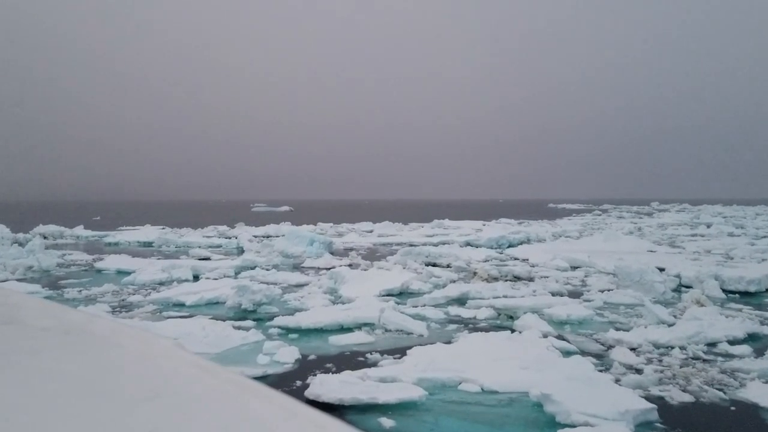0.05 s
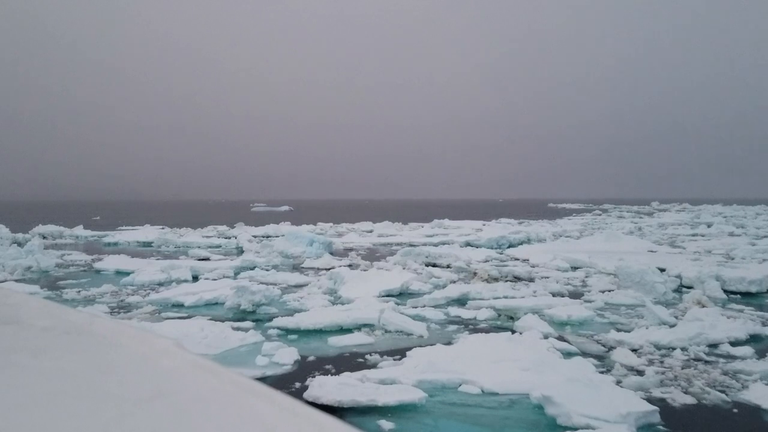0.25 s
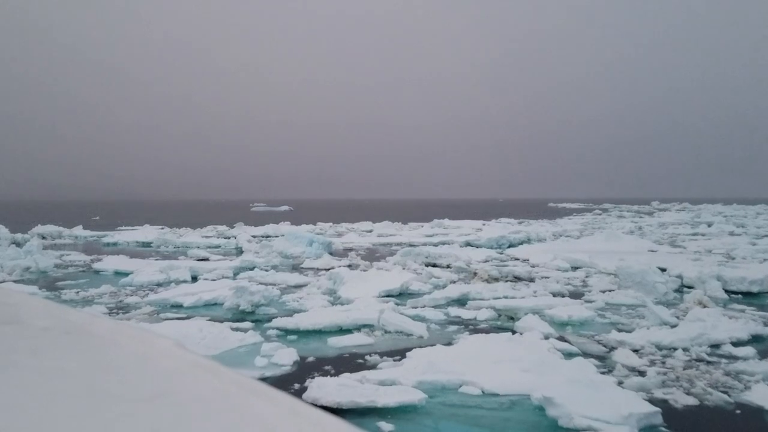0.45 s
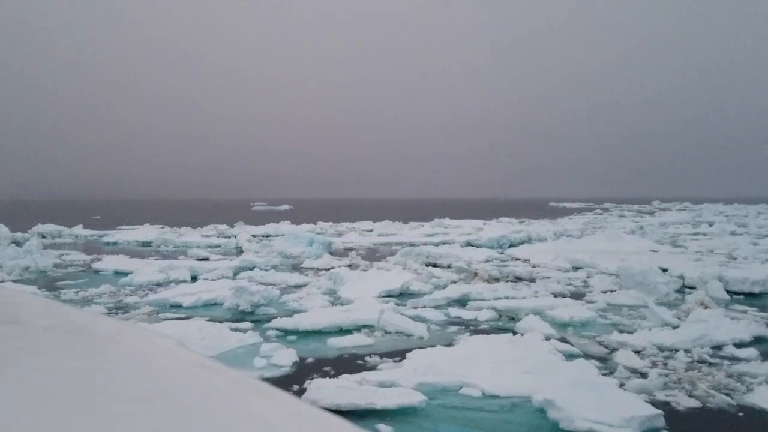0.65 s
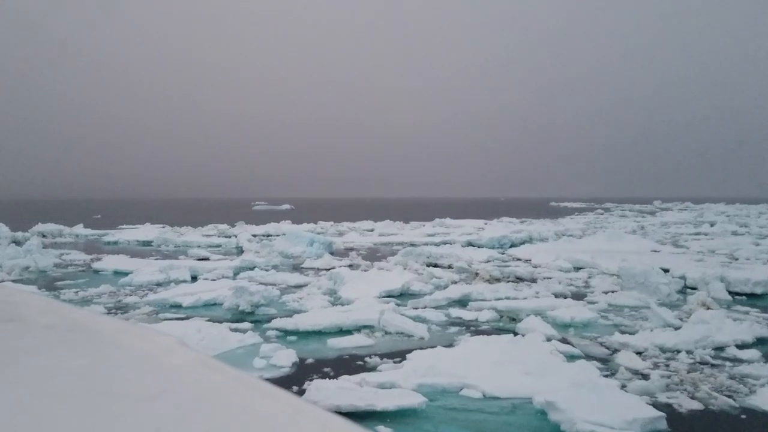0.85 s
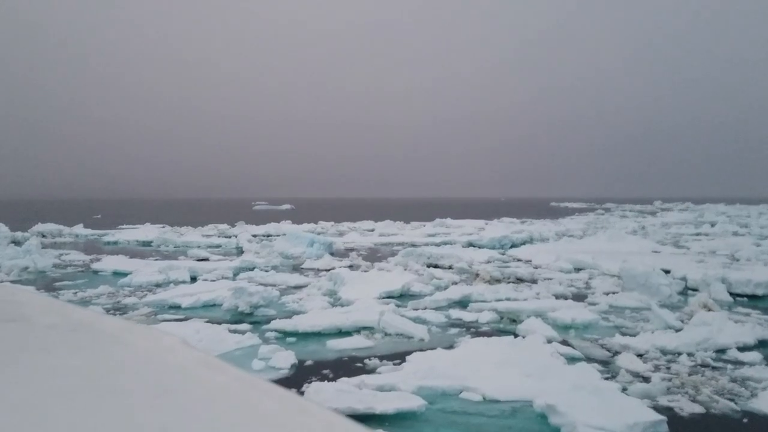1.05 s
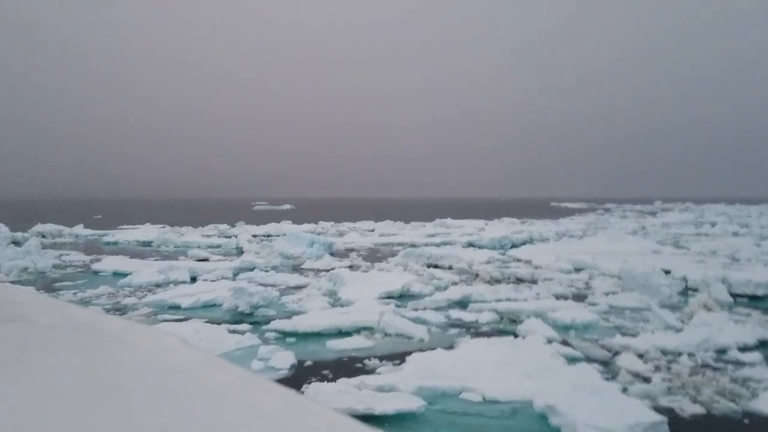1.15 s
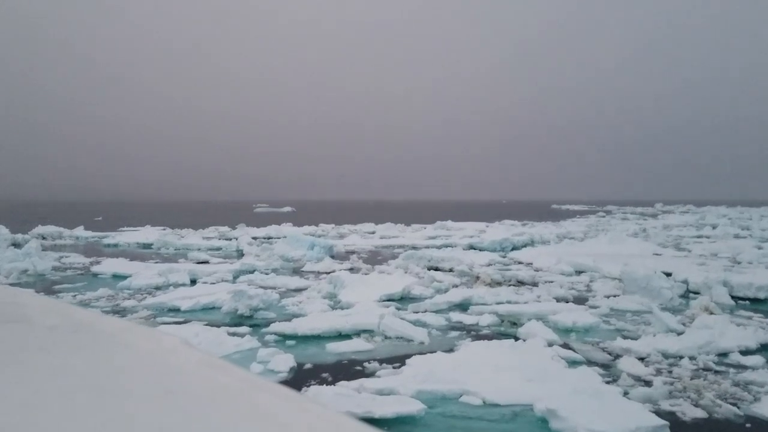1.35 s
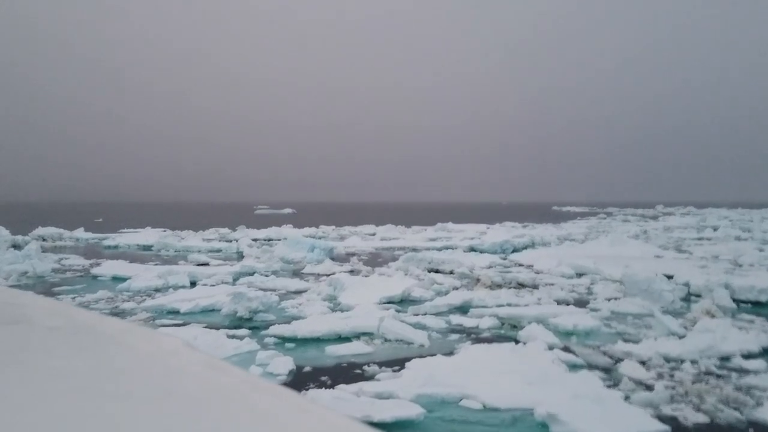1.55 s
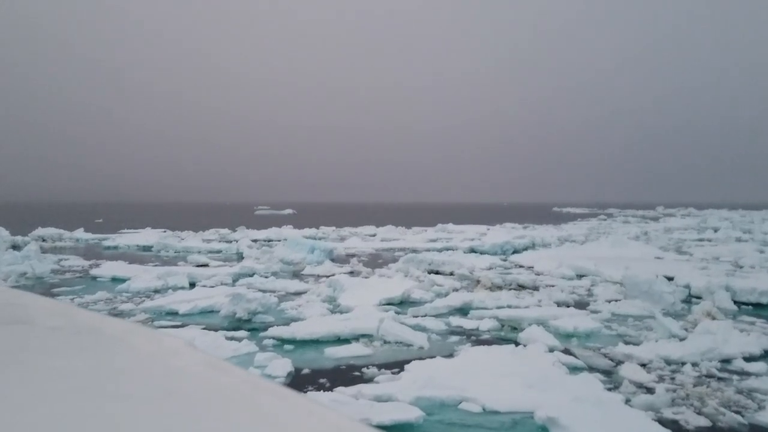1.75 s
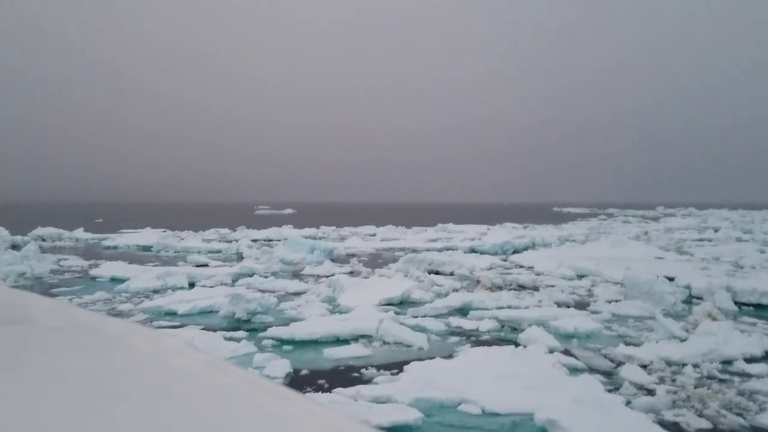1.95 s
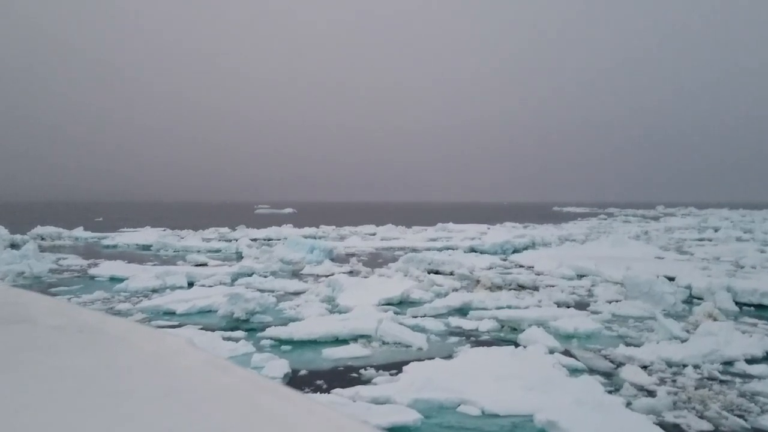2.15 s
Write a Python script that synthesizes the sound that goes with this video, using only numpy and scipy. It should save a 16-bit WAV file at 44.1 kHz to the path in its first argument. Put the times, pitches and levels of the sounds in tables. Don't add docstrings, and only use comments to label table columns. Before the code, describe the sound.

Low booming hull rumble rises quickly and slowly subsides, with crushed ice crunching, short gritty rubs and small cracks; light wind and slush behind. Two spaced deck microphones, hull slightly left, ice nearer the right.

```python
import sys
import numpy as np
from scipy import signal
from scipy.fft import rfft, irfft, next_fast_len
from scipy.io import wavfile
from scipy.ndimage import uniform_filter1d, map_coordinates

SR = 44100
rng = np.random.default_rng(int(sys.argv[2]) if len(sys.argv) > 2 else 0)


def nominal_scale(level):
    x = np.asarray(level, float) / 20
    return 10 ** x


def pcm_store(signal):
    levels = np.round(np.clip(np.atleast_2d(signal), -1, 1) * 32767)
    wavfile.write(sys.argv[1], SR, levels.astype(np.int16).T)


N = 97020

# f/Hz, level/dB per Hz
WIND_COLOUR = [(12, -61), (20, -12.5), (81, -3.5), (189, -33.5), (300, -20), (390, -36), (660, -120)]
# t/s, level/dB
SLUSH_LEVEL = [
    (0.0, -82),
    (0.37, -80.5),
    (0.7, -89),
    (1.68, -90),
    (2.2, -89.5),
]
# f/Hz, level/dB per Hz
SLUSH_COLOUR = [(230, -22.5), (430, 1), (800, -2), (1850, -7), (3640, -17.5), (5600, -22), (12500, -29.5),
                (15600, -35)]
# f/Hz, likeness/0..1
ICE_ALIKE = [(500, .58), (2000, .55), (5000, .42), (9000, .2), (13000, .3)]
# t/s, peak level/dB, f/Hz, length/cycles
TICKS = [(.3865, -71, 2480, 1), (.8645, -59.5, 2450, 1.3), (.8647, -77, 1100, 0.92), (.865, -74, 9500, 1.4),
         (.937, -69.5, 3000, 1.4), (.9372, -61, 1300, 1.1), (1.1402, -71, 3500, 1.1),
         (1.058, -80, 11000, 1.5), (.974, -73, 10000, 1.7), (1.1024, -81, 2500, 1),
         (1.117, -79, 5960, 0.75), (1.14, -67.5, 12000, 1.7), (1.5625, -73, 2480, 1),
         (1.7444, -80, 4000, 14), (1.594, -62, 700, 1.5), (1.772, -57, 600, 1.7), (1.797, -65, 500, 3.3),
         (1.862, -57.5, 376, 6.9), (1.552, -71, 403, 6.3), (1.9, -81, 4800, 4.35), (1.954, -75, 3600, 7.3)]
# t/s, length/s, level/dB, treble lift/dB
SCRAPES = [(0.025, 0.043, -74, 7), (0.163, 0.21, -67.5, -2.5), (0.374, 0.16, -64.5, -4),
           (0.572, 0.1, -62.5, -16), (0.7, 0.046, -70.5, 1), (0.874, 0.033, -67.5, -2),
           (0.895, 0.037, -82, 12), (1.004, 0.031, -87.5, 18), (1.098, 0.041, -65, -3),
           (1.202, 0.023, -78, -1), (1.228, 0.025, -74, -9), (1.301, 0.027, -73, -9), (1.38, 0.052, -75, 3),
           (0.096, 0.034, -68, -8), (1.898, 0.028, -75, -3), (1.916, 0.091, -71.5, -9)]
# f/Hz, level/dB per Hz
SCRAPE_COLOUR = [(500, -52), (1200, 3), (1800, 1), (2800, -7.5), (4400, -16), (5500, -23), (12500, -15),
                 (15600, -27)]
# f/Hz, width/Hz, level/dB
GRIT_RINGS = [(2930, 90, 2), (3620, 230, 5.5), (4330, 100, 6.5)]
# t/s, hull pressure level/dB, crushing level/dB
GRIND = [(0.0, -87, -84), (0.16, -56.5, -84), (0.22, -48, -76), (0.3, -43.5, -67.5), (0.39, -41, -69),
         (0.56, -39.5, -64.5), (0.73, -40, -66.5), (0.88, -43.5, -73.5), (1.15, -49, -75.5),
         (1.21, -48.5, -74), (1.31, -51.5, -75.5), (1.45, -51.5, -76), (1.51, -53, -82.5), (1.6, -52, -80),
         (1.79, -53, -82), (1.9, -56, -77.5), (2.0, -54, -75), (2.12, -58, -77.5), (2.2, -54.5, -74)]
# f/Hz, level/dB per Hz
CRUNCH_COLOUR = [(650, -23), (1100, 4), (1970, -6), (3210, -20), (3570, -21.5), (3980, -19), (4270, -20.5),
                 (6000, -38.5), (7800, -64), (13200, -120)]
# f/Hz, width/Hz, level/dB
CRUNCH_RINGS = [(3600, 230, 4.5), (4200, 130, 0), (2430, 66, -12)]
# t/s, peak level/dB, f/Hz, length/s
BOOMS = [(.054, -66, 478, .025), (.234, -52, 300, .054), (.24, -49, 120, .04), (.285, -42, 72, .055),
         (.299, -43, 286, .06), (.345, -45, 75, .04), (.355, -46, 135, .03), (.4, -45, 100, .04),
         (.41, -46, 420, .06), (.425, -41, 155, .04), (.47, -42, 115, .04), (.47, -46, 280, .07),
         (.495, -38, 80, .06), (.56, -41, 128, .04), (.578, -38, 74, .07), (.645, -40, 124, .05),
         (.66, -45, 70, .05), (.7, -45, 90, .05), (.717, -44, 420, .066), (.76, -40, 124, .05),
         (.77, -42, 68, .05), (.79, -48, 500, .05), (.855, -37, 120, .08), (.92, -47, 90, .04),
         (1.0, -43, 118, .07), (1.06, -45, 85, .04), (1.131, -51, 429, .06), (1.14, -44, 125, .05),
         (1.205, -42, 125, .045), (1.215, -44, 195, .04), (1.265, -47, 105, .045), (1.345, -46, 100, .07),
         (1.4, -48, 122, .05), (1.42, -54, 60, .05), (1.455, -51, 110, .035), (1.56, -54, 90, .04),
         (1.625, -48, 120, .05), (1.668, -47, 130, .03), (1.74, -49, 120, .035), (1.77, -51, 150, .035),
         (1.81, -53, 90, .035), (1.85, -55, 200, .05), (1.935, -48, 112, .04), (1.975, -50, 105, .04),
         (2.02, -53, 125, .04), (2.06, -50, 155, .035), (2.185, -49, 100, .035)]
# f/Hz, level/dB per Hz
HULL_COLOUR = [(18, -47), (35, -8), (60, -2), (115, -1.5), (230, -7), (500, -11.5), (560, -17.5),
               (950, -32), (1300, -42), (2500, -65)]
# f/Hz, width/Hz, level/dB
PLATES = [(74, 14, -8), (122, 22, -6), (195, 25, -2), (286, 12, 3), (418, 10, 4), (497, 10, 1),
          (720, 60, 0), (900, 45, 3)]
# f/Hz, likeness/0..1
HULL_ALIKE = [(40, .82), (130, .94), (300, .9), (550, .58), (1200, .15)]
# f/Hz, extra left level/dB
HULL_LEAN = [(35, -4.5), (70, 1.1), (280, 1), (600, -0.5)]

HULL_LAG_S, ICE_LAG_S = -0.00016, 0.000431


def unit(x):
    return x / np.sqrt(np.mean(x ** 2) + 1e-20)


def along(points, hz):
    f, v = np.transpose(points)
    return np.interp(np.log(hz + 1), np.log(f + 1), v)


def curve(rows, column=1):
    table = np.transpose(rows)
    return np.interp(np.arange(N) / SR, table[0], table[column])


def wobble(rate):
    return map_coordinates(rng.standard_normal(N // 100), [np.arange(N) * rate / SR])


def filtered(x, response):
    m = next_fast_len(N + SR // 2)
    return irfft(rfft(x, m) * response(np.fft.rfftfreq(m, 1 / SR)), m)[..., :N]


def ringing(f, peaks):
    return 1 + sum(nominal_scale(db) * 1j * f * w / (c * c - f * f + 1j * f * w) for c, w, db in peaks)


def even(x, over_s=.08):
    size = round(over_s * SR)
    power = uniform_filter1d(np.mean(x ** 2, axis=0), size=size)
    power = uniform_filter1d(power, size=size)
    return unit(x / np.sqrt(np.abs(power) + 1e-20))


def patchy(depth_db, grains_per_s=None, spread_db=0):
    x = rng.standard_normal((2, N))
    if grains_per_s:
        struck = rng.random((2, N)) < grains_per_s / SR
        x = x * struck * nominal_scale(spread_db * rng.exponential(size=(2, N)))
    z = signal.stft(x, nperseg=512)[2]
    field = uniform_filter1d(rng.standard_normal(z.shape[1:]), size=6, axis=0)
    field = uniform_filter1d(field, size=5, axis=1)
    return signal.istft(z * nominal_scale(depth_db * unit(field)), nperseg=512)[1][:, :N]


def heard(pair, colour, alike, lag_s):
    def turn(hz):
        return np.arccos(np.clip(along(alike, hz), -1, 1)) / 2

    def gain(hz):
        return colour(hz) * np.exp(np.outer([-1j, 1j], np.pi * hz * lag_s))

    shared = filtered(pair[0], lambda hz: gain(hz) * np.cos(turn(hz)))
    opposed = filtered(pair[1], lambda hz: gain(hz) * np.sin(turn(hz)) * [[1], [-1]])
    return unit(shared + opposed)


def wind():
    puffs = heard(patchy(1.5), lambda f: nominal_scale(along(WIND_COLOUR, f)), [(50, .05)], 0)
    gusts_db = 2.5 * np.array([wobble(22), wobble(22)])
    return even(puffs) * nominal_scale(-66.5 + gusts_db)


def slush():
    hiss = heard(patchy(1.6), lambda f: nominal_scale(along(SLUSH_COLOUR, f)), ICE_ALIKE, ICE_LAG_S)
    flutter_db, whole_band_db = .7 * wobble(30), 17
    return even(hiss) * nominal_scale(curve(SLUSH_LEVEL) + whole_band_db + flutter_db)


def ticks():
    out, t = np.zeros(N + SR), np.arange(SR // 50) / SR
    for start, db, hz, cycles in TICKS:
        decay = np.exp(-2.3 * t * hz / cycles)
        out[round(start * SR):][:len(t)] += nominal_scale(db + 14.0) * np.sin(2 * np.pi * hz * t) * decay
    left = np.roll(out, round(ICE_LAG_S * SR))[:N] * nominal_scale(.8)
    return np.array([left, out[:N]])


def scrapes():
    t, out = np.arange(N) / SR, np.zeros((2, N))
    for start, length, db, lift_db in SCRAPES:
        def colour(f):
            treble_db = lift_db * np.clip(f / 6000 - .7, 0, 1)
            return nominal_scale(along(SCRAPE_COLOUR, f) + treble_db) * ringing(f, GRIT_RINGS)

        grit = heard(patchy(1.8, 6000, 1.4), colour, ICE_ALIKE, ICE_LAG_S)
        out += nominal_scale(db) * grit * np.sin(np.pi * np.clip((t - start) / length, 0, 1) ** 0.83)
    return out


def crunch():
    def colour(f):
        return nominal_scale(along(CRUNCH_COLOUR, f)) * ringing(f, CRUNCH_RINGS)

    grains = heard(patchy(2.2, grains_per_s=2500, spread_db=1.1), colour, ICE_ALIKE, ICE_LAG_S)
    return even(grains) * nominal_scale(3.5 + curve(GRIND, column=2))


def booms():
    t = np.arange(N) / SR
    drift = .04 * np.outer([1, -1], wobble(25))
    out = np.zeros((2, N))
    for centre, db, hz, length in BOOMS:
        swell = np.exp(-(2 * (t - centre) / length) ** 2)
        cycles = hz * t + rng.random() + .09 * wobble(40) + drift
        out += nominal_scale(db) * swell * np.sin(2 * np.pi * cycles)
    return np.array([out[0], np.roll(out[1], round(-HULL_LAG_S * SR))])


def rumble():
    push = patchy(1.2)
    knocks = unit(patchy(1.2, grains_per_s=300, spread_db=2))
    shoves = (push + .45 * knocks) * nominal_scale(.9 * wobble(30) + 1.3 * wobble(70))

    def plates(f):
        return nominal_scale(along(HULL_COLOUR, f)) * ringing(f, PLATES)

    def bass(f):
        return 1 / (1 + (f / 190) ** 4)

    deep = heard(shoves, lambda f: plates(f) * bass(f), HULL_ALIKE, HULL_LAG_S)
    body = heard(shoves, lambda f: plates(f) * (1 - bass(f)), HULL_ALIKE, HULL_LAG_S)
    ring = nominal_scale(-6.5) * even(deep, over_s=.03) + nominal_scale(-3) * even(body)
    contact_s, rise_s, before_db = .16, .05, -14
    before = np.clip(1 - (np.arange(N) / SR - contact_s) / rise_s, 0, 1)
    return ring * nominal_scale(curve(GRIND) + .5) * nominal_scale(before_db * before)


def hull():
    plating = rumble() + booms()
    crushing = crunch()
    leaning = filtered(plating, lambda f: nominal_scale(np.outer([.5, -.5], along(HULL_LEAN, f))))
    left_db = 2.5 * np.interp(np.arange(N) / SR, [1.3, 1.5, 1.9, 2.1], [0.58, 0.23, 0.38, 1.0])
    return leaning * nominal_scale(np.outer([.5, -.5], left_db)) + crushing


def scene():
    return hull() + slush() + scrapes() + ticks() + wind()


def roll_off(x):
    return signal.sosfilt(signal.butter(12, 15600, fs=SR, output="sos"), x)


def record(dry):
    hz, _, z = signal.stft(dry, SR, nperseg=2048)
    in_treble = (hz > 9500) & (hz < 11800)
    treble = np.sum(np.abs(z[:, in_treble]) ** 2, axis=(0, 1))
    treble_db = 10 * np.log10(treble + 1e-20)
    burst_db = np.maximum(treble_db - uniform_filter1d(treble_db, size=13) - 2.2, 0)
    base_hz = 12000
    edge = base_hz + 500 * burst_db + 400 * np.maximum(treble_db + 89, 0)
    edge = edge + 300 * rng.standard_normal(len(edge)) * np.clip((edge - base_hz) / 1000, 0, 1)
    lines = np.repeat(rng.random((len(hz) // 4 + 1, len(edge))), 4, axis=0)[:len(hz)]
    share = .5
    z = z * np.where(hz[:, None] < 13000, 1, (lines < share) / np.sqrt(share))
    mix = signal.istft(z * (hz[:, None] < edge), SR, nperseg=2048)[1][:, :N]
    return roll_off(mix)


dry = scene()
out = record(dry)
pcm_store(out)
```